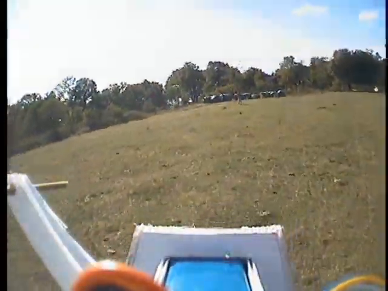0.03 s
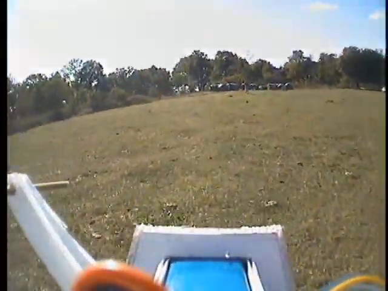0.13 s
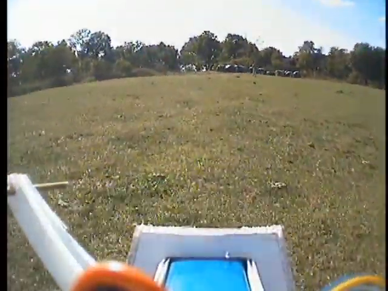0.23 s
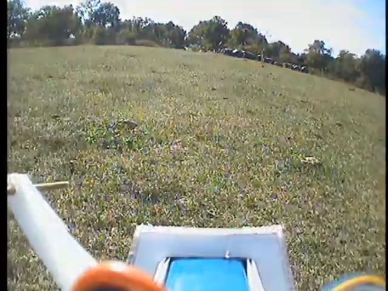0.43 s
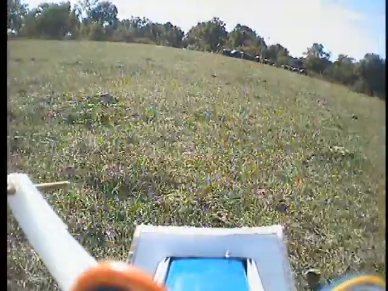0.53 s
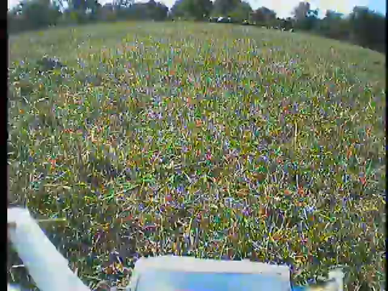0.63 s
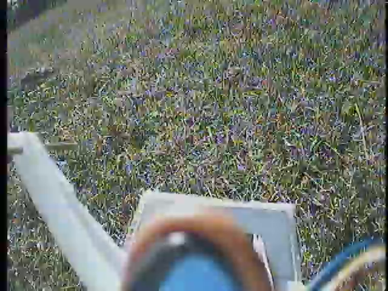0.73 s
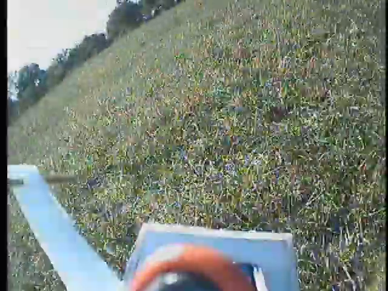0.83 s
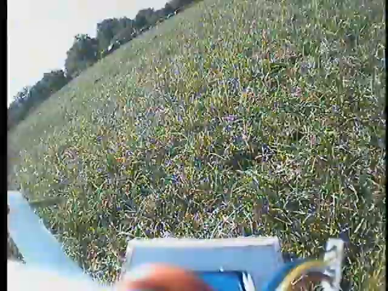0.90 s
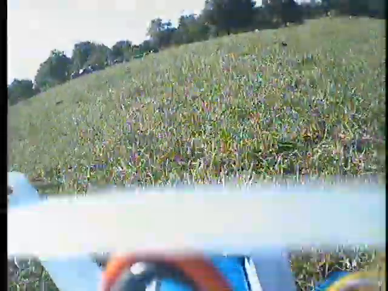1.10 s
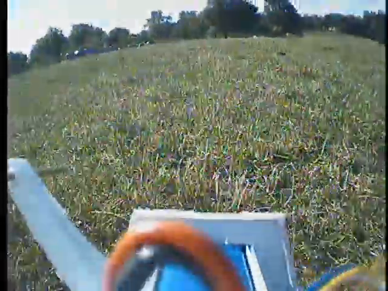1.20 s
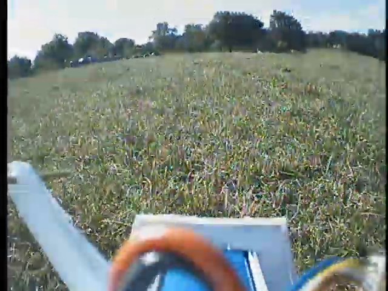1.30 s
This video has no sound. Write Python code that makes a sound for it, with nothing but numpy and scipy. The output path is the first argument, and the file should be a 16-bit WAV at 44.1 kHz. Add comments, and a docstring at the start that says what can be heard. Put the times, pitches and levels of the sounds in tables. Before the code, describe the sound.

Wind rumbles, then a model plane crash-lands with a crunching thud, bouncing and scraping through grass.

```python
"""A small model plane over a meadow, heard up close from the microphone of a camera on board.
It glides in with wind rumbling on the microphone and the propeller idling. At 0.65 s it hits the
ground with a crunching thud that overloads the microphone, and the propeller stops. The hull groans
and scrapes through the grass, bounces, lands again near 1 s and comes to rest as loose parts knock.
The camera's own hiss and a thin whine remain."""
import sys
import numpy as np
from scipy.fft import rfft, irfft, next_fast_len
from scipy.io import wavfile
from scipy.ndimage import map_coordinates

SR = 44100
rng = np.random.default_rng(int(sys.argv[2]) if len(sys.argv) > 2 else 0)


def dump_mix(stems):
    """Bounce the given channels to the path in sys.argv[1] as a 16-bit WAV at rate SR."""
    frames = np.atleast_2d(stems).T  # one column per channel
    limited = np.clip(frames, -1, 1)  # hard clip at full scale
    pcm = np.round(limited * 32767).astype(np.int16)
    wavfile.write(sys.argv[1], SR, pcm)


N = 59535


def amp(db):
    """Decibels to gain."""
    return 10 ** (np.asarray(db) / 20)


def unit_rms(x):
    """Scale to rms 1."""
    return x / np.sqrt(np.mean(x ** 2) + 1e-20)


def clock():
    """The time of each sample in seconds."""
    return np.arange(N) / SR


def fader(points):
    """Gain per sample from (time_s, level_db) points."""
    return amp(np.interp(clock(), *np.transpose(points)))


def wobble(rate_hz):
    """A smooth random curve with rate_hz knots a second."""
    return map_coordinates(rng.standard_normal(8192), [clock() * rate_hz], mode='wrap')


def filtered(x, response):
    """Filter x by a response given as a function of frequency."""
    size = next_fast_len(N + SR // 2)
    return irfft(rfft(x, size) * response(np.fft.rfftfreq(size, 1 / SR)), size)[:N]


def coloured(x, spectrum):
    """Shape x by (frequency_hz, level_db) points, at rms 1."""
    points_hz, db = np.transpose(spectrum)
    return unit_rms(filtered(x, lambda hz: amp(np.interp(np.log(hz + 1), np.log(points_hz), db))))


def noise(spectrum):
    """Smooth coloured noise."""
    return coloured(rng.standard_normal(N), spectrum)


def crackle(spectrum, snaps_per_s, clump_hz, clump_db):
    """Tiny random snaps that swell and fade in clumps."""
    snaps = (rng.random(N) < snaps_per_s / SR) * rng.standard_normal(N)
    clumps = amp(clump_db * np.tanh(wobble(clump_hz)))
    return coloured(snaps * clumps, spectrum)


def envelope(start_s, length_s, t60_s, attack_s=0.0016):
    """A linear attack, a hold until length_s has passed, then an exponential release."""
    t = clock() - start_s
    return np.clip(t / attack_s, 0, 1) * amp(-60 * np.maximum(t - length_s, 0) / t60_s)


# Blows of the airframe on the meadow: start_s, length_s, level_db, release_t60_s
BLOWS = [(.648, 0.0034, -22, 0.035), (.653, 0.011, -14, 0.038), (0.9783, 0.012, -30.5, 0.052),
         (.992, 0.0067, -28.5, 0.044)]
# Spectrum of the crunch, up close: frequency_hz, level_db
CRUNCH_SPECTRUM = [(40, -3.5), (200, 2), (550, -4.5), (1000, -6.5), (1400, -5.5), (2250, -6), (2700, -16),
                   (3600, -14.5), (4500, -7.5), (6500, -19), (8500, -19), (11000, -27.5), (13500, -22.5),
                   (15500, -45)]


def ground_blows():
    """Each blow on the ground crunches and sets the airframe ringing around the microphone."""
    force = sum(amp(db) * envelope(start, length, t60) for start, length, db, t60 in BLOWS)
    crunch = force * crackle(CRUNCH_SPECTRUM, snaps_per_s=9000, clump_hz=600, clump_db=4.5)
    ring_db = -11.5  # relative to the blow
    return crunch + sum(amp(db + ring_db) * airframe_ring(start) for start, _, db, _ in BLOWS)


# Resonances of the airframe: pitch_hz, relative_level_db, t60_s
AIRFRAME_MODES = [(202, 2, 0.12), (299, -3.5, .1), (481, 1, 0.078), (602, -3.5, 0.093), (711, -7.5, 0.094),
                  (916, -8, 0.1), (1486, -9, 0.11), (1820, -4, .07), (2046, -10, .08), (2274, -7.5, 0.081),
                  (2453, -2, 0.049)]


def airframe_ring(start_s):
    """The struck airframe rings short and hollow, its modes balanced anew at each blow."""
    t = clock() - start_s
    ring = np.zeros(N)
    for hz, db, t60 in AIRFRAME_MODES:
        gain = amp(db + rng.normal(0, 1.6)) * envelope(start_s, 0, t60)
        phase = 2 * np.pi * (hz * t + rng.random()) + 0.33 * wobble(150)
        ring += gain * np.sin(phase)
    return ring


# Deep sway of the airframe under a blow: start_s, pitch_hz, level_db, t60_s
THUMPS = [(0.638, 64.6, -22, .1), (0.649, 32, -33, 0.13), (.656, 104.6, -23, 0.11),
          (0.6741, 111.6, -20, 0.076), (0.979, 44.8, -23.5, 0.16), (1.002, 24, -23.5, 0.078)]


def airframe_thumps():
    """The airframe that carries the microphone sways for a few deep cycles."""
    sway = np.zeros(N)
    for start, hz, db, t60 in THUMPS:
        t = np.maximum(clock() - start, 0)
        sway += amp(db - 60 * t / t60) * np.sin(2 * np.pi * hz * t)
    return sway


# Strokes of grass along the hull: start_s, length_s, swish_db, rumble_db
GRASS_STROKES = [(0.631, 0.012, -41.5, -36.5), (0.67, 0.024, -39, -34), (0.702, 0.03, -42, -37),
                 (.736, 0.019, -37.5, -37), (0.763, 0.022, -39.5, -43.5), (0.787, 0.025, -57, -48),
                 (0.826, 0.0064, -42, -52), (0.846, 0.046, -49.5, -42), (0.902, 0.0088, -28, -36),
                 (0.916, 0.0091, -34, -43.5), (0.944, 0.0088, -45.5, -49), (0.967, 0.011, -51.5, -45),
                 (0.987, 0.015, -39.5, -39), (1.011, .018, -38.5, -39.5), (1.033, 0.0092, -37, -47),
                 (1.049, .011, -44.5, -45), (1.11, 0.007, -50, -47), (1.147, 0.0084, -52, -57.5)]
# Spectrum of the swishing blades: frequency_hz, level_db
SWISH_SPECTRUM = [(300, -13), (1200, -8), (2150, 0.5), (2700, -12.5), (3600, -6.5), (4700, 3), (5500, -5.5),
                  (6100, -2), (7200, -14), (9500, -16), (15000, -26.5)]
# Spectrum of the rumbling hull: frequency_hz, level_db
HULL_SPECTRUM = [(40, 6), (150, 4), (300, -1), (430, -3), (620, -7), (900, -11.5), (2100, -8.5),
                 (2800, -18.5), (5000, -18.5), (15000, -35)]


def grass_scrapes():
    """Grass blades flick along the hull, close to the microphone, and the hull rumbles under them."""
    swish, rumble = np.zeros(N), np.zeros(N)
    for start, length, swish_db, rumble_db in GRASS_STROKES:
        contact = envelope(start, length, t60_s=0.048, attack_s=0.0044)
        swish += amp(swish_db) * contact
        rumble += amp(rumble_db) * contact
    swish *= crackle(SWISH_SPECTRUM, snaps_per_s=5000, clump_hz=380, clump_db=3.5)
    rumble *= crackle(HULL_SPECTRUM, snaps_per_s=6000, clump_hz=250, clump_db=2)
    return swish + rumble


def hull_groan():
    """The hull bends as it slides on, with a short rough falling tone."""
    start_s, length_s, from_hz, to_hz, level_db = 0.708, 0.0158, 750, 100, -33.5
    progress = np.clip((clock() - start_s) / length_s, 0, 1)
    pitch_hz = from_hz + (to_hz - from_hz) * progress
    phase = 2 * np.pi * np.cumsum(pitch_hz) / SR + 0.56 * wobble(400)
    return amp(level_db) * envelope(start_s, length_s, t60_s=0.03, attack_s=0.0047) * np.sin(phase)


# Light knocks of loose parts on board: start_s, level_db, pitch_hz
KNOCKS = [(0.6118, -26.5, 730), (0.749, -32.5, 650), (1.0603, -31.5, 1600), (1.117, -45, 1700),
          (1.123, -39.5, 495), (1.28, -43.5, 1720)]


def loose_parts():
    """Loose parts knock dully, each a burst of noise in one broad resonance."""
    q = 1.28
    knocks = np.zeros(N)
    for start, db, hz in KNOCKS:
        def resonance(f):
            return (1j * f * hz / (q * (hz * hz - f * f) + 1j * f * hz)) ** 2
        body = unit_rms(filtered(rng.standard_normal(N), resonance))
        knocks += amp(db) * envelope(start, length_s=0.00097, t60_s=0.014) * body
    return knocks


# Airflow over the microphone: time_s, level_db
AIRFLOW = [(0, -41), (.12, -39.5), (.21, -37.5), (.42, -37), (.58, -38.5), (.72, -36.5), (.81, -54),
           (.87, -35.5), (.95, -45.5), (1.03, -37.5), (1.11, -57.5), (1.35, -73)]
# Spectrum of the wind rumble: frequency_hz, level_db
WIND_SPECTRUM = [(20, -7), (45, -9), (70, -1), (95, 1), (125, -2), (165, -9.5), (230, -12.5), (400, -19),
                 (620, -22.5), (900, -28.5), (2000, -36), (3000, -55), (15000, -74)]


def wind():
    """Air buffets the microphone directly and dies away as the plane stops."""
    buffeting = amp(1.17 * wobble(39.4))
    return fader(AIRFLOW) * buffeting * noise(WIND_SPECTRUM)


# Spectrum of the propeller's ticks: frequency_hz, level_db
TICK_SPECTRUM = [(200, 0), (1200, -5), (2100, 2.5), (2700, -12), (3700, 0.5), (4800, 2), (7000, -11),
                 (15000, -23)]


def propeller():
    """Near the microphone the idling propeller hums unevenly and ticks softly at each blade pass."""
    blade_pass_hz, stop_s, tick_db = 91.6, 0.65, -59
    hum_db = -6.5  # relative to the airflow
    phase = 2 * np.pi * blade_pass_hz * clock() + 0.3 * wobble(6.7)
    passes = unit_rms(amp(7 * np.cos(phase) + 1.56 * wobble(89.8)))
    hum_gain = fader(AIRFLOW) * amp(hum_db + 3.7 * wobble(18))
    hum = hum_gain * np.sin(phase + 0.9 * wobble(30))
    ticks = amp(tick_db) * passes * noise(TICK_SPECTRUM)
    return envelope(0, stop_s, t60_s=0.1) * (ticks + hum)


# Course of the camera's own hiss: time_s, level_db
HISS_LEVEL = [(0, -60), (.35, -57), (.6, -51.5), (1.1, -51), (1.35, -53.5)]
# Spectrum of that hiss: frequency_hz, level_db
HISS_SPECTRUM = [(25, 11), (55, 15.5), (110, 6), (180, 3.5), (350, 1.5), (520, 6.5), (850, -1.5), (1900, 2),
                 (2800, -3.5), (4500, -3.5), (8000, -9.5), (15000, -13)]


def camera_noise():
    """Behind everything lie the camera's fluttering electronic hiss and a thin unsteady whine."""
    flutter_hz, flutter_depth = 50, 0.24
    whine_hz, whine_db = 11800, -74.5
    t = clock()
    flutter = 1 + flutter_depth * np.cos(2 * np.pi * flutter_hz * t)
    hiss = fader(HISS_LEVEL) * flutter * noise(HISS_SPECTRUM)
    whine = amp(whine_db) * np.sin(2 * np.pi * whine_hz * t + 1.4 * wobble(120))
    return hiss + whine


def scene():
    """The glide, the landing and the slide at the on-board microphone, in mono."""
    glide = wind() + propeller()
    landing = ground_blows() + airframe_thumps()
    slide = hull_groan() + grass_scrapes() + loose_parts()
    return (glide + landing + slide + camera_noise())[None]


def record(dry):
    """The microphone saturates on the hardest blow; the camera limits the band."""
    ceiling, hardness, cutoff_hz = amp(-12), 4, 15600
    saturated = dry[0] / (1 + np.abs(dry[0] / ceiling) ** hardness) ** (1 / hardness)
    return filtered(saturated, lambda hz: hz < cutoff_hz)[None]


dry = scene()
out = record(dry)
dump_mix(out)
```